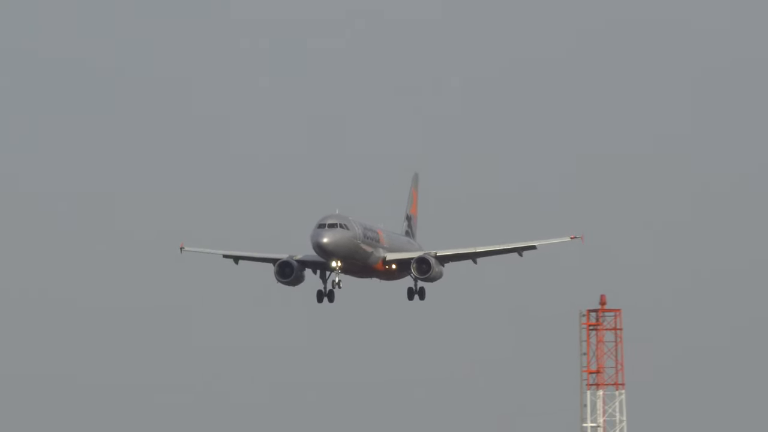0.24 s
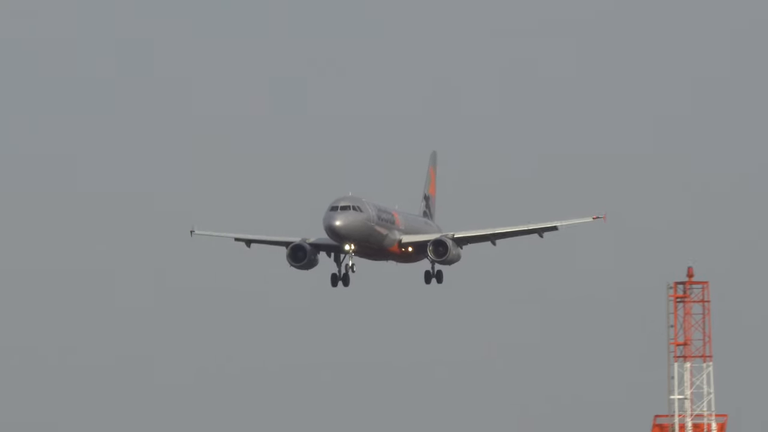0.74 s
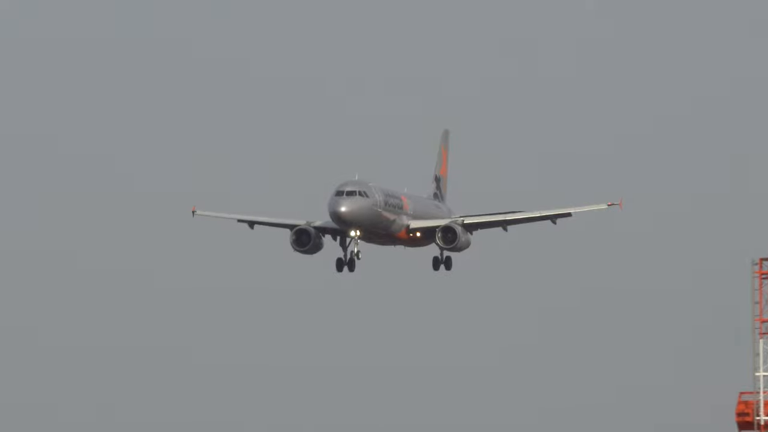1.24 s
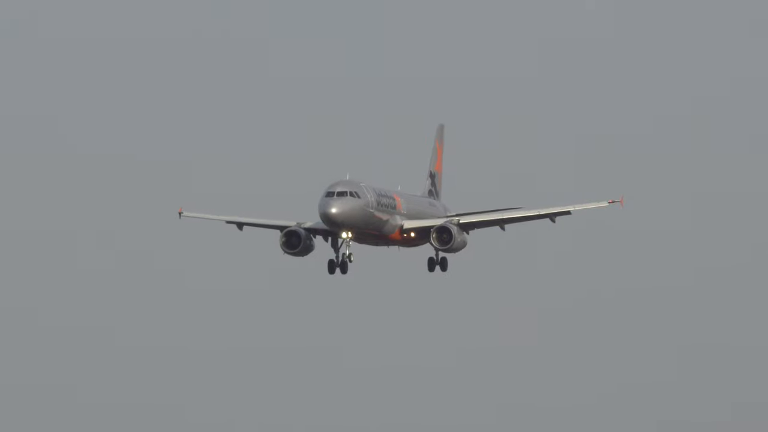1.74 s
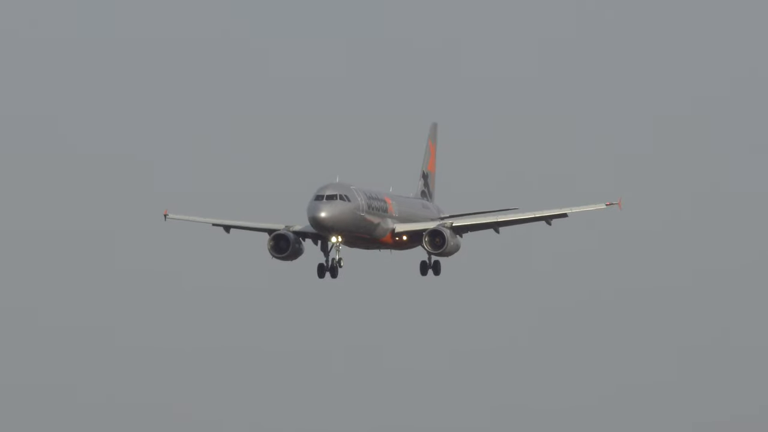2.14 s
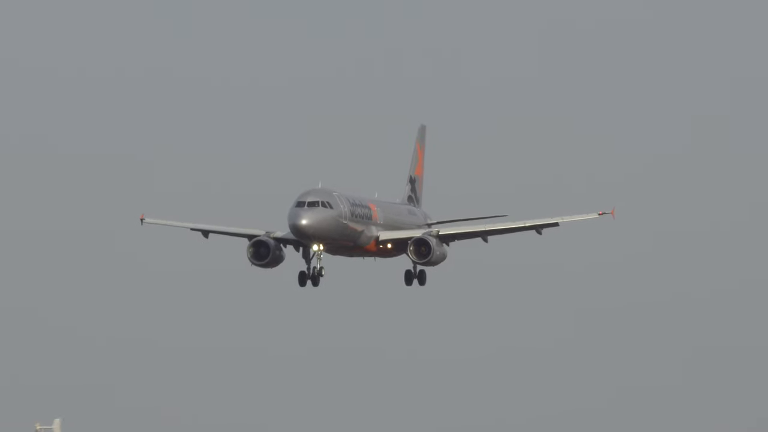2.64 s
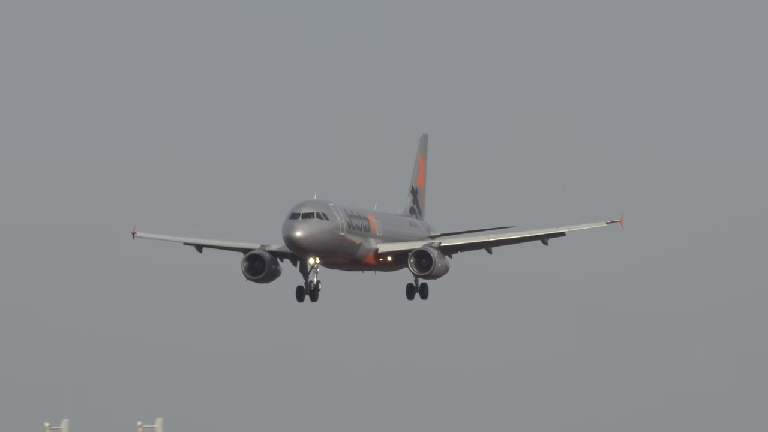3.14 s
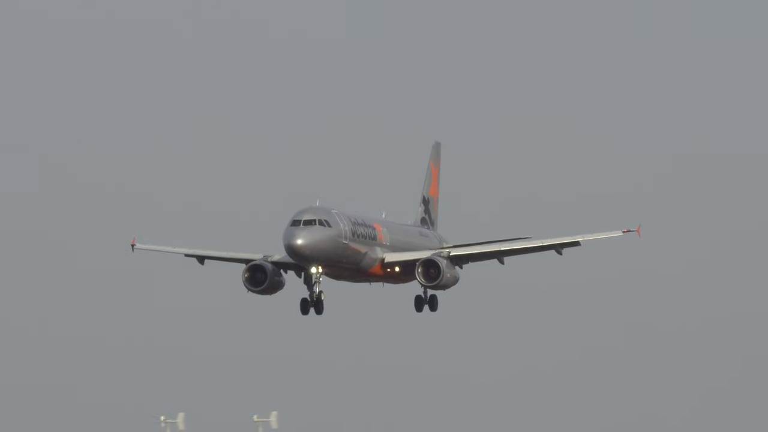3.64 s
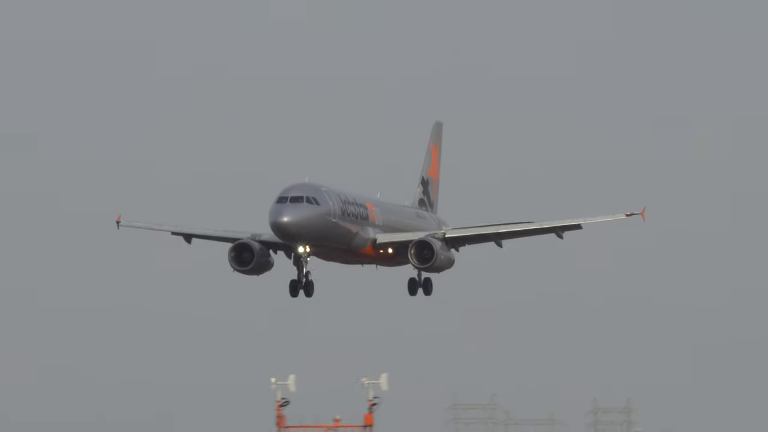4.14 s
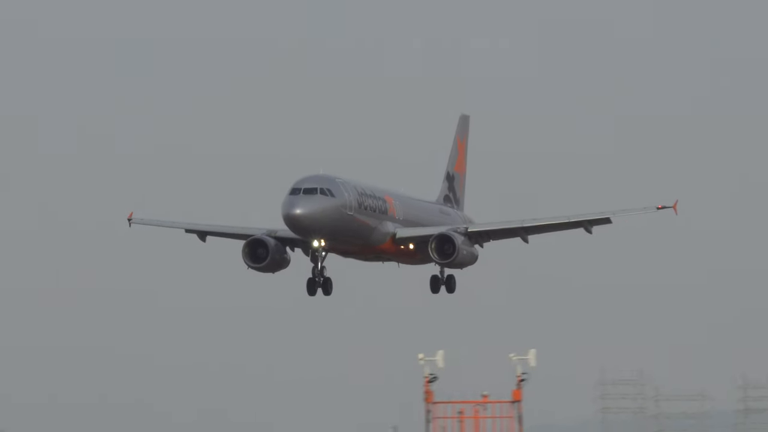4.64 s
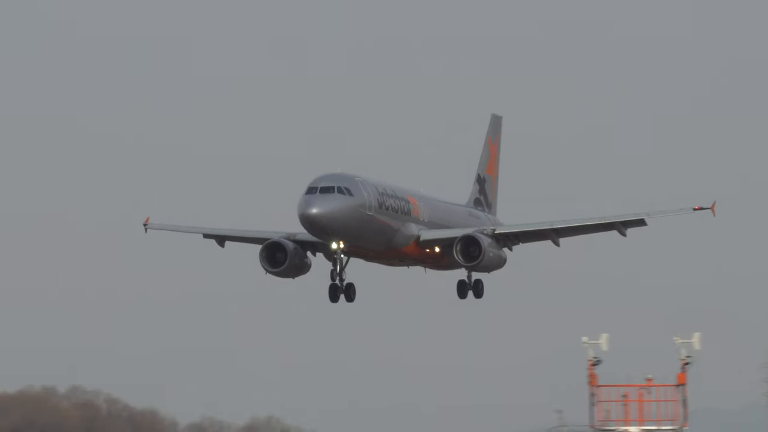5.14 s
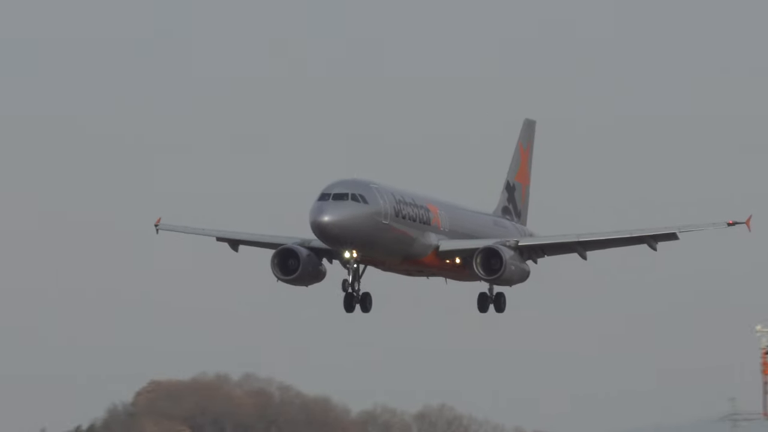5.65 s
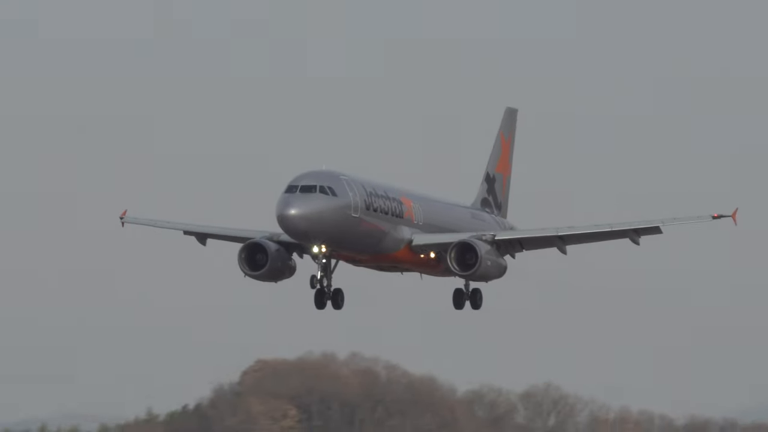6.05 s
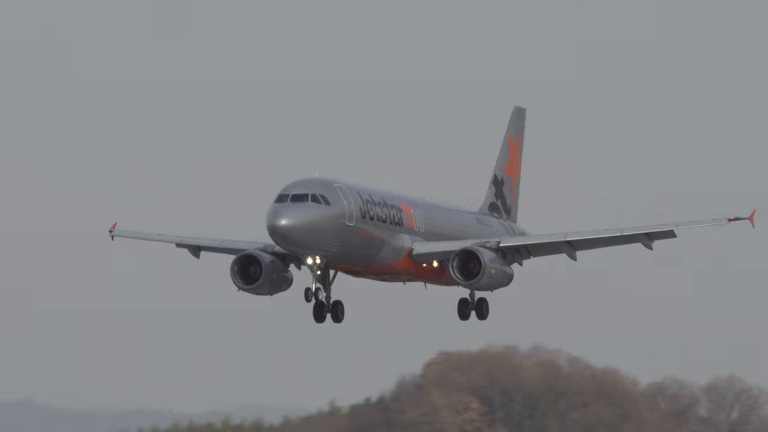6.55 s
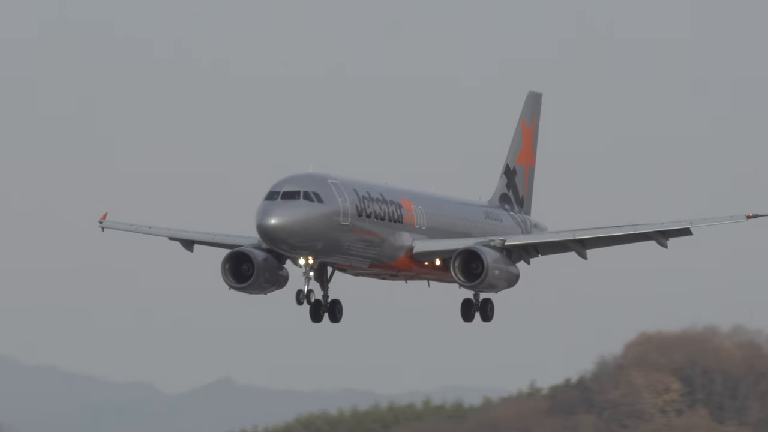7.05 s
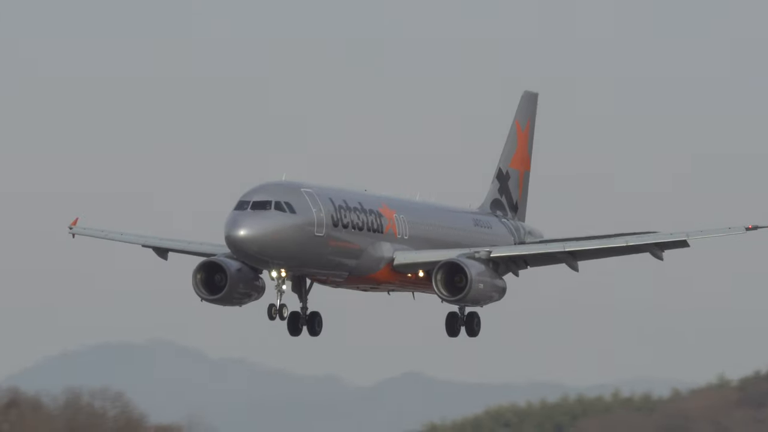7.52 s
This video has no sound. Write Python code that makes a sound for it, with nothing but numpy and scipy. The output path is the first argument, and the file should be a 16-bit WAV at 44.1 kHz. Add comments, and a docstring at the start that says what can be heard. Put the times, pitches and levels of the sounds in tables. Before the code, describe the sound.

An approaching twin-engine jet airliner is heard across an open, windy airfield, clearly louder and slightly earlier on the right. From 0 to 2 s the jet is a distant, dull low roar with barely audible whine, while soft deep wind rumble rises and falls on the microphone. Strong gusts buffet around 3 s, with another near 4.7 s. The roar swells unevenly, dips around 4 s, then surges at about 5 s, becoming fuller and brighter. Two fan tones a little above 1 kHz, close in pitch, beat, fade and waver, with thinner compressor whines around twice as high. A smaller gust comes near 6.4 s. At about 6.7 s the fan rush and whine leap forward, dip briefly, and return from 7.1 s, staying loud to the end at 7.8 s. Treble shimmers through moving air; faint hiss remains underneath, with slight diffuse outdoor reflections.

```python
"""Airliner landing across a breezy airfield

A twin-engined jet comes in to land, heard across an open airfield by a two-port microphone whose right side
hears it earlier and louder. Its roar is banded noise that swells unevenly and brightens as the air path shortens.
Two fans whine slightly apart in pitch, fading in and out, above thinner compressor whines: all wavering tones.
Wind rumbles on the ports as low noise following gusts, over a faint recorder hiss."""
import sys
import numpy as np
from scipy import signal
from scipy.fft import rfft, irfft, next_fast_len
from scipy.io import wavfile
from scipy.ndimage import uniform_filter1d, minimum_filter1d, map_coordinates

SR = 44100
rng = np.random.default_rng(int(sys.argv[2]) if len(sys.argv) > 2 else 0)


def dump_mix(stems):
    """Bounce the given channels to the path in sys.argv[1] as a 16-bit WAV at rate SR."""
    frames = np.atleast_2d(stems).T  # one column per channel
    limited = np.clip(frames, -1, 1)  # hard clip at full scale
    pcm = np.round(limited * 32767).astype(np.int16)
    wavfile.write(sys.argv[1], SR, pcm)


N = 343098
TIME = np.arange(N) / SR
FFT_SIZE = next_fast_len(N)
BIN_HZ = np.maximum(np.arange(FFT_SIZE // 2 + 1) * SR / FFT_SIZE, 1)   # at least 1, for the logarithm


def from_db(db):
    """Decibels to gain."""
    return 10 ** (np.asarray(db) / 20)


def in_time(rows):
    """Each column of a curve table, joined by straight lines, at every sample."""
    seconds, *columns = np.transpose(rows)
    return [np.interp(TIME, seconds, column) for column in columns]


def drift(rate):
    """Smooth chance of spread 1 that changes about rate times a second."""
    count = 8192
    hz = np.arange(count // 2 + 1) * SR / N
    spectrum = rfft(rng.standard_normal(count))
    slow = irfft(spectrum / (1 + (hz / rate) ** 4))
    return np.interp(np.arange(N) * count / N, np.arange(count), slow / slow.std())


def delayed(x, lag_ms):
    """The sound read late by a fixed or changing number of milliseconds."""
    position = (TIME - lag_ms / 1000) * SR
    return map_coordinates(x, [position], order=3, mode="mirror")


def swelling_noise(colour, parts, levels_db, flutter_db):
    """Noise of one colour, split into overlapping parts that each follow a level and flutter a little."""
    colour_hz, colour_db = np.transpose(colour)
    log_hz = np.log(BIN_HZ)
    gain = from_db(np.interp(log_hz, np.log(colour_hz), colour_db))
    spectrum = rfft(rng.standard_normal(FFT_SIZE)) * gain
    centres = np.log([np.sqrt(low * high) for low, high, trim_db in parts])
    out = np.zeros(N)
    for (low, high, trim_db), level_db, own in zip(parts, levels_db, np.eye(len(parts))):
        # each part fades out towards the centres of its neighbours
        share = np.interp(log_hz, centres, own)
        band = spectrum[(BIN_HZ > low) & (BIN_HZ < high)]
        band_rms = np.sqrt(2 * np.sum(np.abs(band) ** 2)) / FFT_SIZE
        part = irfft(spectrum * share, FFT_SIZE)[:N] / band_rms
        out += part * from_db(level_db + trim_db + flutter_db * drift(27))
    return out


# Faint hiss of the recorder. Each row: time in seconds, level in dB.
HISS_LEVEL = [(0, -61.5), (2.3, -61), (3.9, -63.3), (5.8, -61), (7.1, -64), (7.78, -63.5)]


def recorder_hiss():
    """Independent white noise on each channel, its level shifting a little."""
    level_db, = in_time(HISS_LEVEL)
    return from_db(level_db) * rng.standard_normal((2, N))


# Strength of the wind on the microphone. Each row: time in seconds, level of the large eddies in dB before trim.
GUST_LEVEL = [(0, -22), (.75, -17), (1.95, -14.5), (2.3, -19), (2.8, -11.5), (3.45, -10), (3.95, -18),
              (4.35, -17), (4.62, -12.5), (5.1, -18.5), (5.62, -21), (6.05, -19.5), (6.35, -14),
              (6.85, -15), (7.4, -18), (7.78, -26)]
# Large, then small eddies. Each row: low and high edge in Hz of the band that sets the level, trim in dB.
EDDY_BANDS = [(21.1, 130, 1), (49.9, 81, 0.35)]
# Colour of the wind. Each row: frequency in Hz, relative density in dB per Hz.
WIND_SPECTRUM = [(2, -15.5), (8, 0), (17, -1), (30, -3.5), (50, -13), (80, -21.5), (120, -32.5),
                 (250, -66.5), (500, -57), (1500, -100)]
# small eddies follow the same gusts: mean level (dB, before trim) and share of the swing
SMALL_EDDY_DB, SMALL_EDDY_FOLLOWS = -27.5, 0.63
LEFT_WIND_DB = -8   # left port against the right


def wind():
    """The same gusts reach both ports, but each port has eddies of its own."""
    gust_db, = in_time(GUST_LEVEL)
    small_db = SMALL_EDDY_DB + SMALL_EDDY_FOLLOWS * (gust_db - gust_db.mean())
    levels_db = [gust_db, small_db]
    left, right = [swelling_noise(WIND_SPECTRUM, EDDY_BANDS, levels_db, flutter_db=0.84) for port in range(2)]
    return np.array([from_db(LEFT_WIND_DB) * left, right])


def scattered(x, t60):
    """Diffuse returns from fences and trees: decaying noise tails, different at each port."""
    decay = from_db(-60 * TIME[:SR // 2] / t60)
    tails = rng.standard_normal((2, SR // 2)) * decay
    tails /= np.linalg.norm(tails, axis=1, keepdims=True)
    return signal.fftconvolve(x[None], tails, axes=1)[:, :N]


# How late the ground reflection trails the direct sound. Each row: time in seconds, lag in ms.
REFLECTION_LAG = [(0, 2.45), (5.6, 2.72), (6.6, 2.23), (7.3, 4.32), (7.78, 3.76)]


def over_ground(x, echo_db, grass_hz):
    """Grass returns a dull echo, which cuts a comb of wandering notches into the roar."""
    lag_ms, = in_time(REFLECTION_LAG)
    dulling = signal.butter(1, grass_hz, fs=SR, output="sos")
    echo = signal.sosfilt(dulling, delayed(x, lag_ms))
    return x + from_db(echo_db) * echo


def through_air(x, depth, detour_ms, wander_ms, above_hz):
    """Eddies bend some treble onto longer paths that come and go, so its colour shimmers."""
    high_pass = signal.butter(1, above_hz, "high", fs=SR, output="sos")
    treble = signal.sosfilt(high_pass, x)
    for path in (1, 2):
        lag_ms = path * detour_ms + wander_ms * drift(3.7)
        x = x + depth * drift(4.7) * delayed(treble, lag_ms)
    return x


FADE_DB, FADES_PER_S = 1.5, 1.5   # chance fading of every tone: spread and rate


def blade_tone(pitch_hz, level_db, scatter, waver_hz, skirt_db, octave_db=-np.inf):
    """A rotor tone and octave; turbulence bends pitch, fades and shakes strength, spreads a skirt of noise."""
    phase = 2 * np.pi * np.cumsum(pitch_hz + waver_hz * drift(7.9)) / SR
    shake = 1 + scatter * (drift(6.8) + 1j * drift(8.2))
    skirt = from_db(skirt_db) * (drift(40) + 1j * drift(40))
    fundamental = (shake + skirt) * np.exp(1j * phase)
    octave = from_db(octave_db) * shake * np.exp(2j * phase)
    fading = from_db(level_db + FADE_DB * drift(FADES_PER_S))
    return np.sqrt(2) * fading * (fundamental + octave).real


# Blade-passing tones of the two engines. Each row: time in seconds, first fan in Hz, second fan in Hz.
FAN_TONES = [(0, 1126, 1151), (2, 1095, 1126), (3.6, 1093, 1123), (5.5, 1076, 1103), (6.25, 1067, 1094),
             (6.7, 1062, 1083), (7.1, 1060, 1082), (7.78, 1063, 1092)]
# Thinner whines from the compressors. Each row: time in seconds, low whine in Hz, high whine in Hz.
COMPRESSOR_TONES = [(0, 2088, 2470), (2, 2077, 2362), (5.2, 2086, 2284), (6.8, 2063, 2255),
                    (7.3, 2053, 2262), (7.78, 2061, 2296)]
# The fans take turns to dominate. Each row: time in seconds, dB by which the first rises and the second falls.
FAN_TURNS = [(0, -1), (1.6, 6), (2.5, 2.5), (3.6, -1), (4.6, -0.5), (5, 4), (5.6, -4.5), (6.25, -4),
             (6.75, 4.5), (7.2, -0.5), (7.78, 0.5)]
# levels before balance and fading, with the rush and the treble at their near levels
FIRST_FAN_DB, SECOND_FAN_DB = -32.5, -33
LOW_WHINE_DB, HIGH_WHINE_DB = -43.5, -55.5
WHINE_FOLLOWS = 1.14   # dB of whine per dB of treble


def engine_tones(swell_db, clear_db):
    """Two fans beat together, their octaves carrying only through clear air; compressors add thinner lines."""
    first_hz, second_hz = in_time(FAN_TONES)
    low_hz, high_hz = in_time(COMPRESSOR_TONES)
    balance_db, = in_time(FAN_TURNS)
    first_db = FIRST_FAN_DB + swell_db + balance_db
    second_db = SECOND_FAN_DB + swell_db - balance_db
    carry_db = WHINE_FOLLOWS * clear_db
    fans = blade_tone(first_hz, first_db, scatter=.22, waver_hz=.6, skirt_db=-19, octave_db=clear_db - 22)
    fans += blade_tone(second_hz, second_db, scatter=.25, waver_hz=.8, skirt_db=-17, octave_db=clear_db - 10)
    whines = blade_tone(low_hz, LOW_WHINE_DB + carry_db, scatter=.35, waver_hz=2.0, skirt_db=-15)
    whines += blade_tone(high_hz, HIGH_WHINE_DB + carry_db, scatter=.3, waver_hz=1.5, skirt_db=-16)
    return fans + whines


# Roar on the way in. Each row: time in seconds, exhaust in dB, air over flaps and gear in dB, before trim.
ROAR_LEVEL = [(0, -45.5, -48.5), (1.8, -42, -39), (2.7, -39, -41.5), (3.4, -40.5, -44.5), (4, -43, -45.5),
              (4.6, -40.5, -41), (5.05, -36, -34.5), (5.7, -35, -32.5), (6, -37, -36), (6.9, -38.5, -29),
              (7.78, -38, -32.5)]
# Rush of the fans, growing as the aircraft nears. Each row: time in seconds, level in dB before trim.
RUSH_LEVEL = [(0, -46), (.6, -48), (2.25, -45.5), (2.8, -43.5), (4, -43.5), (4.75, -39.5), (4.98, -34.5),
              (5.2, -37.5), (5.55, -33), (6.15, -33), (6.45, -30.5), (6.7, -23.5), (6.93, -31.5),
              (7.1, -26.5), (7.78, -27)]
# Treble, coming through the moving air in surges. Each row: time in seconds, level in dB before trim.
TREBLE_LEVEL = [(0, -72.5), (1.2, -71), (1.5, -64), (1.85, -68), (2.5, -64.5), (4.05, -64), (4.25, -57.5),
                (4.55, -57.5), (4.75, -52), (4.9, -55.5), (5.2, -50), (5.87, -56.5), (6.23, -48),
                (6.42, -54.5), (6.67, -45), (6.97, -48.5), (7.12, -45.5), (7.78, -46)]
# Deep rumble, exhaust, airframe, fan rush, treble, top edge.
# Each row: low and high edge in Hz of the band that sets the level, trim in dB.
ROAR_PARTS = [(87.5, 161, -1.5), (220, 492, 0.36), (525, 986, 0.34), (1174, 1640, -0.4),
              (2583, 2900, -0.44), (3710, 6800, -21.5)]
# Colour of the aircraft when near. Each row: frequency in Hz, relative density in dB per Hz.
JET_SPECTRUM = [(45, -21.5), (95, 0), (140, -1.5), (200, -9), (340, -12.5), (500, -7.5), (800, -2),
                (1150, -2.5), (1400, -2.5), (2000, -10.5), (2500, -16), (3200, -27), (4000, -36.5),
                (6500, -67.5)]
RUMBLE_DB, RUMBLE_FOLLOWS = -35, .5   # mean level before trim, share of the exhaust's swing
RUSH_NEAR_DB, TREBLE_NEAR_DB = -25, -46   # levels at which the tones stand at their own settings
FAN_FOLLOWS = 1.075   # dB of fan tone per dB of rush
# the top edge opens up as the air path shortens: its rate, and when it has caught up with the treble (before trim)
EDGE_OPENS_DB_PER_S, EDGE_OPEN_S = 5.5, 7.25


def airliner():
    """Broad roar of exhaust, airframe and intakes, with the tones of both engines on top."""
    exhaust_db, airframe_db = in_time(ROAR_LEVEL)
    rush_db, = in_time(RUSH_LEVEL)
    treble_db, = in_time(TREBLE_LEVEL)
    rumble_db = RUMBLE_DB + RUMBLE_FOLLOWS * (exhaust_db - exhaust_db.mean())
    edge_db = treble_db + EDGE_OPENS_DB_PER_S * (TIME - EDGE_OPEN_S)
    levels_db = [rumble_db, exhaust_db, airframe_db, rush_db, treble_db, edge_db]
    roar = swelling_noise(JET_SPECTRUM, ROAR_PARTS, levels_db, flutter_db=0.5)
    roar = through_air(roar, depth=.18, detour_ms=.75, wander_ms=.12, above_hz=1400)
    roar = over_ground(roar, echo_db=-13, grass_hz=1000)
    swell_db = FAN_FOLLOWS * (rush_db - RUSH_NEAR_DB)
    clear_db = treble_db - TREBLE_NEAR_DB   # how well treble gets through the air: 0 when near
    return roar + engine_tones(swell_db, clear_db)


LEFT_JET_DB, PORT_LAG_MS = -12, 0.897   # the left port hears the aircraft this much weaker and later


def scene():
    """The aircraft off to the right, wind on the ports and a little hiss."""
    jet = airliner()
    left = from_db(LEFT_JET_DB) * delayed(jet, PORT_LAG_MS)
    direct = np.array([left, jet])
    diffuse = from_db(-23) * scattered(jet, t60=.35)
    return direct + diffuse + wind() + recorder_hiss()


CUTOFF_HZ = 15760


def record(dry):
    """A smooth limiter turns both channels down around peaks over full scale; a steep filter cuts the top."""
    size = SR // 25   # 40 ms
    room_left = 1 / np.maximum(np.abs(dry).max(axis=0), 1)
    gain = uniform_filter1d(minimum_filter1d(room_left, size), size)
    gain *= np.sin(np.pi / 2 * np.minimum(TIME / .008, 1)) ** 2   # 8 ms fade-in
    low_pass = signal.ellip(12, .1, 80, CUTOFF_HZ, fs=SR, output="sos")
    return signal.sosfilt(low_pass, dry * gain)


dry = scene()
out = record(dry)
dump_mix(out)
```